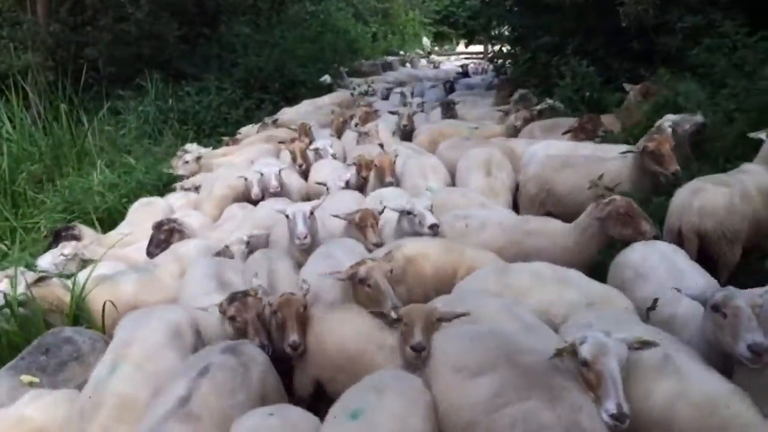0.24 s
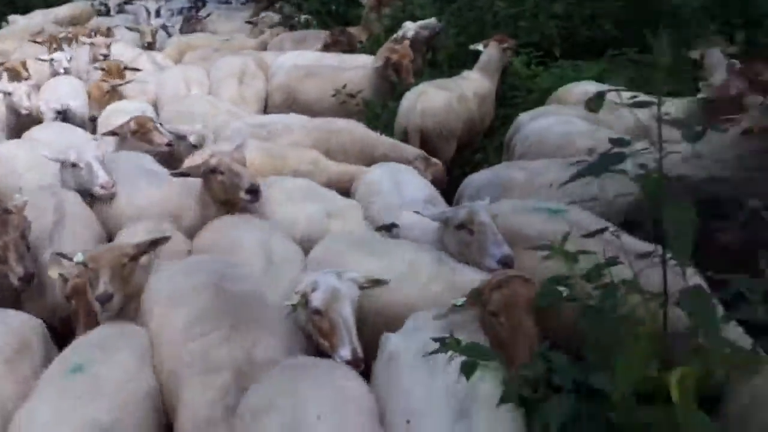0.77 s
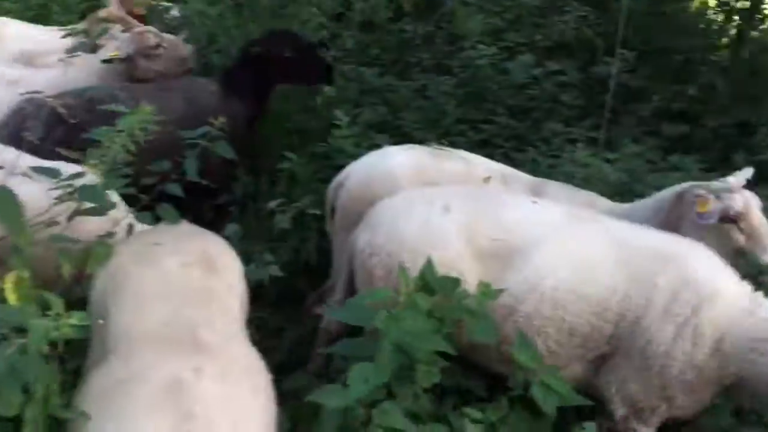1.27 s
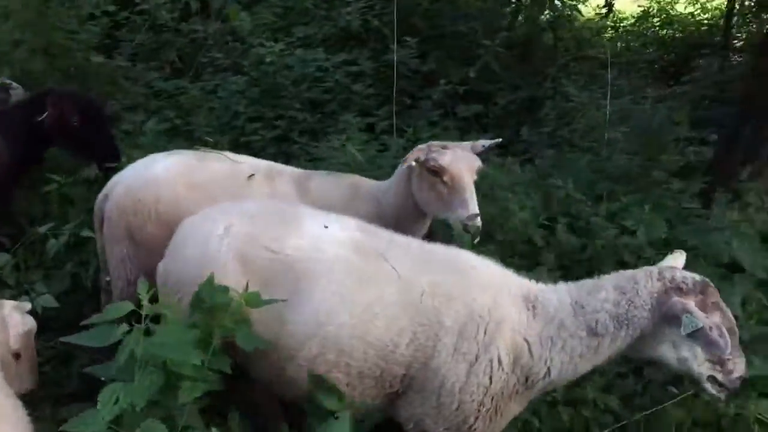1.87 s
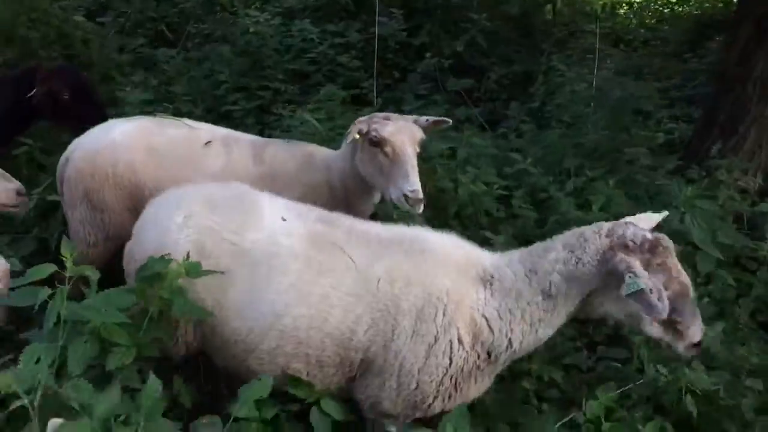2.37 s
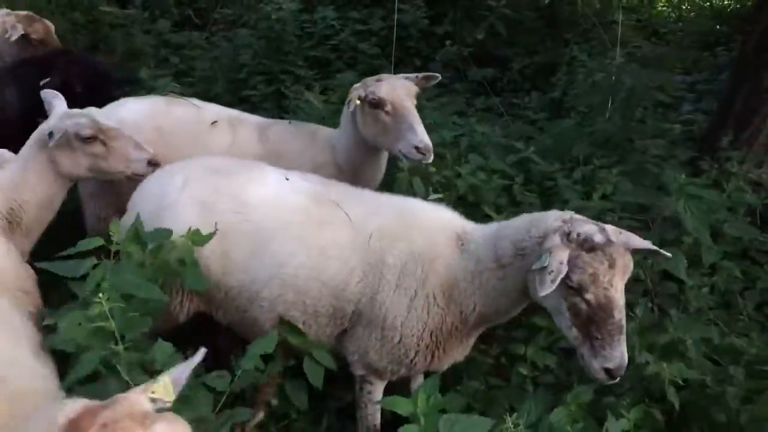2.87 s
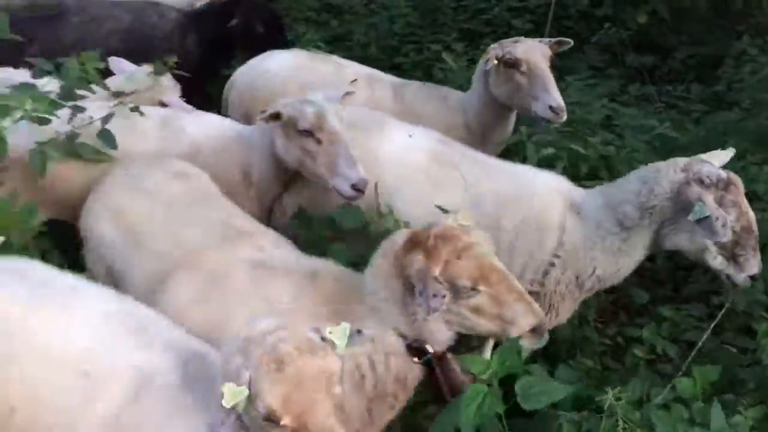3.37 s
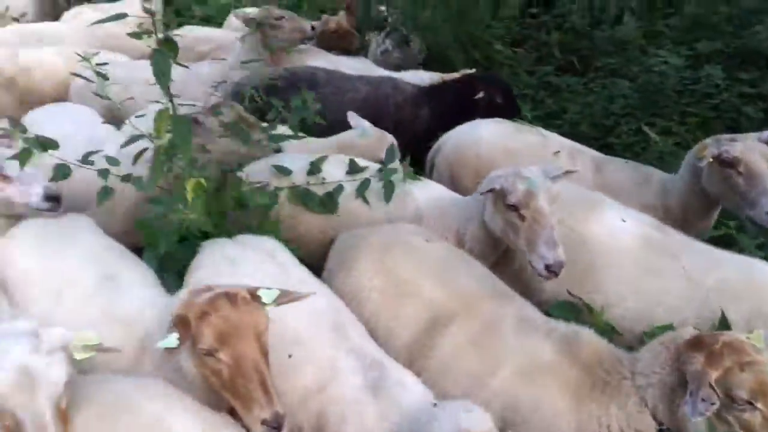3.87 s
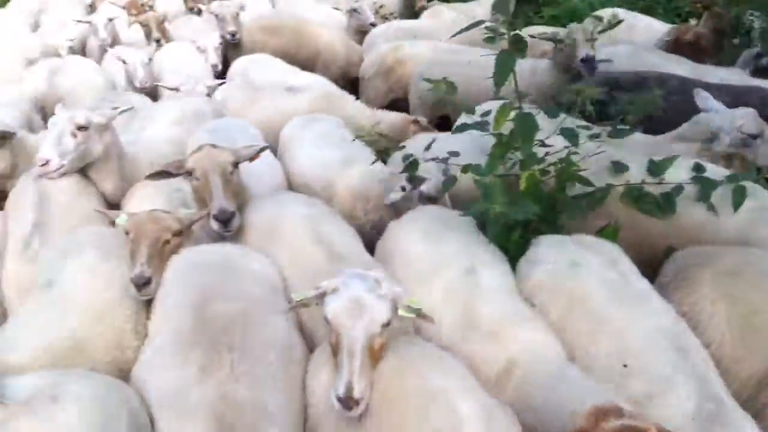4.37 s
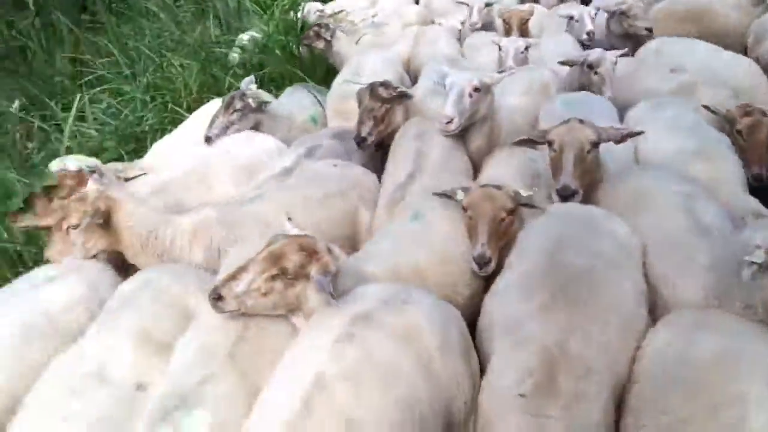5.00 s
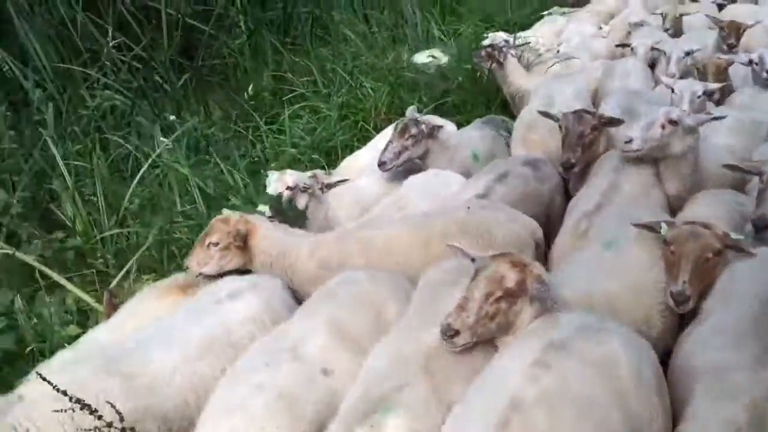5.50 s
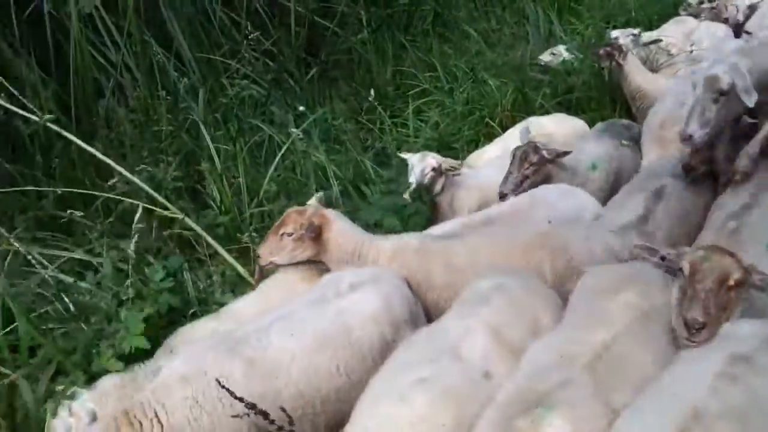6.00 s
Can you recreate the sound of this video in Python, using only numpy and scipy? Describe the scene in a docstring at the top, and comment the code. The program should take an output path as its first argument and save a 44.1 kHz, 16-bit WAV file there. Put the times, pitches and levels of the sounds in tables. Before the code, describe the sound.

Close dull bell clonks with clinky edges, leaves swishing, twigs cracking, low tread of many sheep, and later faint tinkling bells far off.

```python
"""Sheep flock with a clonking bell

A flock crowds along a woodland path, pushing through nettles and grass: shaped noise rustles and rumbles.
Twigs snap as bursts of noise, hooves thud as slow swelling cycles; far bells tinkle with two partials each.
One sheet-metal bell clonks close by at uneven moments: air tone, split wall modes and a noisy clink.
Both channels carry the same mono sound."""
import sys
import numpy as np
from scipy import signal
from scipy.fft import rfft, irfft
from scipy.io import wavfile

SR = 44100
rng = np.random.default_rng(int(sys.argv[2]) if len(sys.argv) > 2 else 0)


def master(y):
    """Save y as 16-bit WAV."""
    cut = np.clip(np.atleast_2d(y).T, -1, 1)
    pcm = np.round(cut * 32767)  # scale
    wavfile.write(sys.argv[1], SR, pcm.astype(np.int16))


N = 275625
TIME_S = np.arange(N) / SR
AGE_S = TIME_S[:SR]  # time since onset, up to 1 s


def from_db(db):
    """Decibels to gain."""
    return 10 ** (np.asarray(db) / 20)


def rms_one(x):
    """Scale to unit power."""
    return x / np.sqrt(np.mean(x ** 2) + 1e-20)


def add(out, t_s, sound):
    """Mix a sound in from time t_s."""
    at = max(round(t_s * SR), 0)
    out[at:at + len(sound)] += sound[:max(len(out) - at, 0)]


def fade(t60_s):
    """Free exponential decay, 60 dB down after t60_s."""
    return np.exp(-np.log(1000) * AGE_S / t60_s)


def ring(hz, t60_s):
    """One decaying mode at random phase."""
    return fade(t60_s) * np.sin(2 * np.pi * (hz * AGE_S + rng.random()))


def band(x, low_hz, high_hz):
    """Gentle Butterworth band-pass."""
    return signal.sosfilt(signal.butter(2, [low_hz, high_hz], "band", fs=SR, output="sos"), x)


def burst(low_hz, high_hz, t60_s):
    """Decaying crack of band-limited noise."""
    noise = rng.standard_normal(len(AGE_S))
    return rms_one(band(noise, low_hz, high_hz)) * fade(t60_s)


def coloured(x, spectrum):
    """Shape a steady sound to a spectrum, rolled off below its first point; unit power."""
    hz, db = np.transpose(spectrum)
    bin_hz = np.maximum(np.fft.rfftfreq(N, 1 / SR), 1)
    shape = from_db(np.interp(np.log(bin_hz), np.log(hz), db))
    low_cut = 1 / np.hypot(1, (hz[0] / bin_hz) ** 2)
    return rms_one(irfft(rfft(x) * shape * low_cut, N))


def drift(points_per_s):
    """Random points joined by straight lines; unit power."""
    points = rng.standard_normal(4000)
    return rms_one(np.interp(TIME_S * points_per_s, np.arange(len(points)), points))


def rustle(spectrum, touches_per_s, grain_db, size_db, patchy_db):
    """Many leaves sliding make a smooth hiss; nearer ones tick in clumps above it."""
    touch_rate = touches_per_s * from_db(5 * drift(25))
    touches = rng.random(N) < touch_rate / SR
    sizes = from_db(size_db * np.minimum(rng.exponential(1, N), 4))
    ticks = touches * rng.standard_normal(N) * sizes
    grains = signal.fftconvolve(ticks, burst(310, 19845, t60_s=0.0047))[:N]
    mix = rng.standard_normal(N) + from_db(grain_db) * rms_one(grains)
    return coloured(mix, spectrum) * from_db(patchy_db * drift(30))


# flock against undergrowth, before trims: t/s, leaf swish level/dB, stalk rustle level/dB
FLOCK_PUSH = [(0.0, -47, -45), (0.12, -51, -46), (0.21, -46.5, -51.5), (0.57, -46, -46), (0.87, -47, -48.5),
              (1.04, -45, -44.5), (1.44, -42.5, -47), (1.6, -45.5, -48), (1.84, -47, -49), (2.52, -42, -45),
              (2.82, -45, -49), (2.98, -36.5, -41), (3.12, -37.5, -42), (3.19, -36.5, -40.5),
              (3.45, -38, -41), (3.57, -39, -46), (3.86, -44, -48.5), (4.21, -47, -48.5),
              (4.67, -47.5, -48.5), (4.92, -46, -47), (5.08, -41, -49), (5.26, -43, -47),
              (6.13, -48.5, -48.5), (6.25, -50.5, -49)]
# leaf spectrum: f/Hz, relative level/dB per Hz
LEAF_SPECTRUM = [(1500, -4), (3500, -4), (5500, 0), (7500, 1), (10000, -3.5), (13000, -7), (15500, -18)]
# stalk spectrum: f/Hz, relative level/dB per Hz
STALK_SPECTRUM = [(150, -2), (300, 5), (500, 2.5), (800, 1.5), (1400, 0.5), (2500, -2), (4000, -4.5),
                  (8000, -7.5)]
# tread spectrum: f/Hz, relative level/dB per Hz
TREAD_SPECTRUM = [(20, -32), (35, -6), (60, 3.5), (100, 4), (150, -1), (210, 1), (300, -21), (700, -35)]
LEAF_TRIM_DB, STALK_TRIM_DB = -0.5, 1.5
TREAD_DB, TREAD_DB_PER_S = -50.5, -0.17
TREAD_FOLLOW = 0.27  # share of the swish's dB swing


def undergrowth():
    """Fleeces brush leaves and stalks; the tread of the whole flock rumbles underneath."""
    t_s, *columns = np.transpose(FLOCK_PUSH)
    swish_db, stalk_db = [np.interp(TIME_S, t_s, c) for c in columns]
    tread_db = TREAD_DB + TREAD_DB_PER_S * TIME_S + TREAD_FOLLOW * (swish_db - swish_db.mean())
    leaves = rustle(LEAF_SPECTRUM, touches_per_s=970, grain_db=-6.5, size_db=0.5, patchy_db=1.76)
    stalks = rustle(STALK_SPECTRUM, touches_per_s=360, grain_db=-8.0, size_db=5.0, patchy_db=1.9)
    tread = coloured(rng.standard_normal(N), TREAD_SPECTRUM) * from_db(2.0 * drift(20))
    leaves = from_db(LEAF_TRIM_DB + swish_db) * leaves
    stalks = from_db(STALK_TRIM_DB + stalk_db) * stalks
    return leaves + stalks + from_db(tread_db) * tread


# small distant bells: t/s, lower partial f/Hz, level/dB, upper partial f/Hz, level/dB
FAR_BELL_NOTES = [(3.832, 6185, -42.5, 9400, -44.5), (3.92, 5500, -56, 9700, -50),
                  (4.0, 6185, -51, 9230, -48), (4.154, 5500, -48, 9850, -44), (4.375, 6050, -47, 9100, -49),
                  (4.74, 6000, -63.5, 9800, -48), (4.96, 5400, -54, 9800, -48),
                  (5.441, 5430, -42, 9750, -45)]


def far_bells(t60_s=0.48):
    """Only two thin partials of each small bell carry this far."""
    out = np.zeros(N)
    for t_s, lower_hz, lower_db, upper_hz, upper_db in FAR_BELL_NOTES:
        lower = from_db(lower_db) * ring(lower_hz, t60_s)
        upper = from_db(upper_db) * ring(upper_hz, t60_s)
        add(out, t_s, lower + upper)
    return out


# snapping twigs and stalks: t/s, level/dB before crack and knock offsets, centre f/Hz
TWIG_SNAPS = [(0.3002, -22, 1300), (0.3051, -22, 1250), (.401, -32.5, 4500), (0.5275, -35, 3020),
              (.6938, -25, 1560), (0.7064, -25.5, 1600), (.978, -29, 2960), (.997, -30.5, 3800),
              (1.9512, -30, 7000), (3.2089, -28.5, 2980), (3.5313, -39, 3550), (3.909, -27.5, 2320),
              (4.8871, -26.5, 5000), (5.3296, -31, 3400), (5.3513, -25.5, 3650)]
TWIG_HZ, KNOCK_DB_PER_OCTAVE = 1510, -3  # thinner twigs crack higher and knock less


def twig_snaps(width_ratio=1.64, crack_db=-2.0, knock_db=-4.0):
    """A breaking twig gives a crack and a dull knock."""
    out = np.zeros(N)
    for t_s, db, hz in TWIG_SNAPS:
        crack = burst(hz / width_ratio, hz * width_ratio, t60_s=0.018)
        add(out, t_s, from_db(db + crack_db) * crack)
        octaves_up = max(np.log2(hz / TWIG_HZ), 0)
        knock_gain = from_db(db + knock_db + KNOCK_DB_PER_OCTAVE * octaves_up)
        add(out, t_s, knock_gain * burst(310, 1020, t60_s=0.024))
    return out


# soft thuds and bumps: t/s, level/dB, f/Hz, swell/s
HOOF_THUDS = [(.333, -37, 620, 0.015), (.565, -40, 101, 0.016), (1.148, -43.5, 96, 0.02),
              (2.951, -33, 106, .009), (3.022, -32, 141, 0.013), (3.377, -27, 198, 0.02),
              (5.346, -39, 81, 0.017), (5.55, -38, 186, .0054)]


def hoof_thuds(crumble_db=-6.5):
    """Soft earth answers a hoof with a few slow cycles and a low crumble of noise."""
    out = np.zeros(N)
    for t_s, db, hz, swell_s in HOOF_THUDS:
        push = (AGE_S / swell_s * np.exp(1 - AGE_S / swell_s)) ** 3
        cycles = np.sin(2 * np.pi * hz * AGE_S)
        crumble = from_db(crumble_db) * burst(70, 188, t60_s=1)
        add(out, t_s, from_db(db) * push * (cycles + crumble))
    return out


AIR_HZ = 894  # free pitch of the air inside the bell


def air_tone(swell_s, t60_s, press_hz_s=1.3, bend_hz=76.0, settle_s=0.007, waver_hz=5.4,
             tock_hz=1020, tock_db=-4.0):
    """The wall pumps the air in the bell, which swells to a hollow note."""
    envelope = (1 - np.exp(-(AGE_S / swell_s) ** 1.76)) * fade(t60_s)
    abruptness = 1 / (1 + (swell_s / 0.005) ** 2)
    # a clapper that stays pressed on the wall both shortens and sharpens the note
    hz = AIR_HZ + press_hz_s / t60_s + waver_hz * drift(72)[:len(AGE_S)]
    # abrupt blows start sharp and wake a brief tock above the note
    hz = hz + abruptness * bend_hz * np.exp(-AGE_S / settle_s)
    cycles = np.cumsum(hz) / SR + rng.random()
    note = envelope / envelope.max() * np.sin(2 * np.pi * cycles)
    return note + abruptness * from_db(tock_db) * ring(tock_hz, t60_s=0.047)


def minor_modes(count, t60_s):
    """The crowd of weak, short-lived modes of a hammered sheet, cut off after t60_s."""
    hz = np.exp(rng.uniform(np.log(5500), np.log(12000), (count, 1)))
    brief_s = AGE_S[AGE_S < t60_s]
    modes = np.sin(2 * np.pi * (hz * brief_s + rng.random((count, 1))))
    crowd = modes.sum(axis=0) / np.sqrt(count)
    return np.pad(crowd, (0, len(AGE_S) - len(brief_s))) * fade(t60_s)


# higher wall modes: f/Hz, relative level/dB, t60/s
HIGH_WALL_MODES = [(6152, -8, .14), (6435, -12, .11), (6880, -18, .08), (7610, -11, .12), (7840, -13, .07),
                   (7998, -11, .13), (8160, -16, .08), (8830, -17, .08), (8908, -9, .12), (9100, -13, .11),
                   (9343, -9, .11), (9790, -11, .13), (10420, -16, .11), (10775, -12, .11),
                   (11140, -14, .11), (11680, -15, .1), (12050, -17, .09), (13105, -15, .08),
                   (13500, -18, .07), (14230, -18, .08)]


def clink(favoured_hz, favour_db=6.5, reach=0.08, scatter_db=3.5, modes_db=-2.0, minor_db=-3.0,
          scrape_db=2.5, tick_db=-12.0, rebound_db=1.0):
    """The clapper scrapes the wall and rings its high modes, most of all near the favoured pitch."""
    sound = from_db(scrape_db) * burst(5860, 8100, t60_s=0.014)
    sound += from_db(tick_db) * burst(790, 5000, t60_s=0.069)
    sound += from_db(minor_db) * minor_modes(count=24, t60_s=0.02)
    for hz, db, t60_s in HIGH_WALL_MODES:
        nearness = 1 / (1 + (np.log(hz / favoured_hz) / reach) ** 2)
        mode_db = modes_db + db + favour_db * nearness + scatter_db * rng.standard_normal()
        sound += from_db(mode_db) * ring(hz, t60_s)
    # chatter: a second contact within a few milliseconds
    add(sound, rng.uniform(0.0017, 0.0047), from_db(rebound_db) * minor_modes(count=40, t60_s=0.023))
    return sound * (1 - np.exp(-AGE_S / 0.0011))


# how long the air tone rings, varying unevenly and shortest at the end: t/s, air tone base t60/s
AIR_SUSTAIN = [(0, 0.11), (1.5, 0.17), (2.7, 0.078), (3.2, 0.27), (3.5, 0.21), (3.65, 0.057), (4.7, .12),
               (6.25, 0.051)]
# bending modes split by the oval wall, low pair then high: lower f/Hz, t60/s, upper f/Hz, t60/s
WALL_MODE_PAIRS = [(2121, .9, 2482, .8), (4114, .42, 4350, .24)]
LOW_LEAN_DB = -2  # low pair's lean to its upper mode, relative to the high pair's
SPOT_HZ, SPOT_OCTAVE_DB = 9130, 41  # favoured clink pitch at zero lean; lean that lowers it an octave
# high pair minus air tone in a typical blow; excess that doubles the air t60
CLEAN_HIT_DB, SUSTAIN_DOUBLING_DB = -18.5, 28


def strike(t_s, air_db, swell_s, low_db, high_db, lean_db, clink_db):
    """A blow sounds air, wall pairs and clink; the spot struck splits each pair and tints the clink."""
    base_t60_s = max(np.interp(t_s, *np.transpose(AIR_SUSTAIN)), .01)
    air_t60_s = base_t60_s * 2 ** ((high_db - air_db - CLEAN_HIT_DB) / SUSTAIN_DOUBLING_DB)
    body = from_db(air_db) * air_tone(max(swell_s, 1e-4), air_t60_s)
    spots_rad = np.arctan(from_db([lean_db + LOW_LEAN_DB, lean_db]))
    for db, spot_rad, pair in zip((low_db, high_db), spots_rad, WALL_MODE_PAIRS):
        lower_hz, lower_t60_s, upper_hz, upper_t60_s = pair
        lower = np.cos(spot_rad) * ring(lower_hz, lower_t60_s)
        upper = np.sin(spot_rad) * ring(upper_hz, upper_t60_s)
        body += from_db(db) * (lower + upper)
    favoured_hz = SPOT_HZ * 2 ** (-lean_db / SPOT_OCTAVE_DB)
    return body, from_db(clink_db) * clink(favoured_hz)


# clapper strikes: t/s, air tone level/dB, its swell/s, low wall pair level/dB, high wall pair level/dB,
# lean to the upper mode of the high pair/dB, clink level/dB
CLAPPER_STRIKES = [(0.073, -45, 0.0054, -41, -39.5, 6, -33.5), (.21, -31, 0.0096, -45, -34.5, 3, -30.5),
                   (0.269, -17, 0.003, -36, -36, -3, -37), (.279, -17, 0.011, -41.5, -32, -6, -30),
                   (.598, -12.5, 0.0056, -28.5, -23.5, 26, -22.5), (.63, -26, 0.003, -36, -26.5, 0, -35),
                   (0.647, -26.5, 0.0032, -39, -26.5, 10, -29.5),
                   (.711, -40.5, 0.0099, -43.5, -43, 10, -40),
                   (.839, -31.5, 0.0033, -41.5, -34.5, -10, -32), (1.077, -22.5, .002, -38, -36, 6.5, -27),
                   (1.187, -33.5, .0008, -46, -50.5, -4, -41), (1.255, -35.5, 0.00064, -46.5, -59, 18, -42),
                   (1.489, -10.5, 0.0058, -42, -27, 13, -21), (1.596, -16, 0.0062, -44, -45.5, 22, -34.5),
                   (1.75, -23.5, 0.0012, -47, -42.5, -1, -35), (2.086, -27.5, 0.00027, -46, -26, 17, -26.5),
                   (2.361, -36, .004, -52, -38, 12, -35), (2.586, -33.5, 0.0034, -54, -47, 7, -45),
                   (2.72, -22, 0.0065, -41, -37.5, 14, -30.5), (2.741, -22, 0.0056, -51, -52, -4, -35),
                   (3.025, -31.5, 0.009, -64, -40, 6, -37), (3.11, -22, 0.0023, -52, -72, -8, -35),
                   (3.148, -28, 0.0033, -55, -41, -6, -52), (3.18, -26.5, 0.0011, -54, -43, 12, -52),
                   (3.218, -21, 0.0073, -41.5, -44, 6, -32), (3.25, -24.5, 0.0012, -46, -78, -12, -49),
                   (3.282, -39, 0.0045, -56, -40, 10, -55), (3.467, -34, .001, -36, -25, 11, -20),
                   (3.477, -29.5, 0.0023, -49, -29.5, 5, -21.5),
                   (3.494, -16.5, 0.0054, -32.5, -34, 4, -19.5), (3.518, -21.5, 0.0044, -32, -31.5, 7, -31),
                   (3.591, -26, 0.0027, -42, -54, 16, -35), (3.613, -16, 0.0097, -47, -39, 11, -32),
                   (3.646, -20.5, 0.0077, -57, -45, 5, -36), (4.312, -40, 0.0021, -63, -52, 5, -58),
                   (4.499, -43, 0.0021, -63, -61, 3, -45), (4.701, -28, .0038, -44, -44.5, 3, -33.5),
                   (4.786, -40.5, 0.0045, -50.5, -60, -16, -60), (5.021, -33, 0.0034, -64, -39.5, 12, -48),
                   (5.377, -35.5, 0.0061, -57, -48, 2, -44), (5.415, -60, .003, -54.5, -48, 5, -52),
                   (5.598, -35, 0.0019, -65, -57, 12, -56), (5.7, -36, 0.0071, -65, -55, 20, -54),
                   (5.777, -39, .002, -54, -55, -12, -46), (5.966, -43, 0.0034, -58, -42.5, -12, -38),
                   (5.989, -25, 0.0044, -58, -43, 4, -36.5), (6.04, -36, .003, -66, -47, 10, -43),
                   (6.198, -42, 0.004, -65, -59, 7.5, -53)]


def near_bell(choke_t60_s=0.073):
    """The clapper strikes as the sheep walks; its next touch chokes the air tone and wall pairs."""
    out = np.zeros(N)
    next_touch_s = [row[0] for row in CLAPPER_STRIKES[1:]] + [np.inf]
    for (t_s, *blow), until_s in zip(CLAPPER_STRIKES, next_touch_s):
        body, top = strike(t_s, *blow)
        choked_for_s = np.maximum(t_s + AGE_S - until_s, 0)
        choke = np.exp(-np.log(1000) * choked_for_s / choke_t60_s)
        add(out, t_s, body * choke + top)
    return out


FALL_BACK_S, FALL_BACK_SPREAD = .06, .25  # typical delay; its log spread
FALL_BACK_DB, FALL_BACK_SWELL_S, FALL_BACK_T60_S = -47, 0.0032, 0.13


def fall_backs(spread_db=3.0):
    """After the last blow of a run the clapper falls back lightly and stirs only the air tone."""
    out = np.zeros(N)
    times_s = [row[0] for row in CLAPPER_STRIKES]
    for t_s, pause_s in zip(times_s, np.diff(times_s, append=np.inf)):
        if pause_s > 2 * FALL_BACK_S:
            delay_s = FALL_BACK_S * np.exp(FALL_BACK_SPREAD * rng.standard_normal())
            db = FALL_BACK_DB + spread_db * rng.standard_normal()
            add(out, t_s + delay_s, from_db(db) * air_tone(FALL_BACK_SWELL_S, FALL_BACK_T60_S))
    return out


def scene():
    """Undergrowth, far bells, steps and the near bell, the same in both channels."""
    mono = undergrowth() + far_bells() + twig_snaps() + hoof_thuds() + near_bell() + fall_backs()
    return np.stack([mono, mono])


def record(dry):
    """Steep elliptic low-pass at 15.6 kHz."""
    return signal.sosfilt(signal.ellip(10, .1, 80, 15600, fs=SR, output="sos"), dry)


dry = scene()
out = record(dry)
master(out)
```